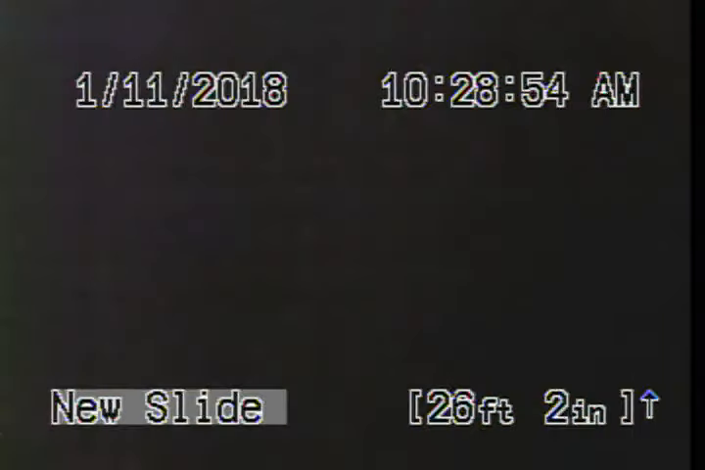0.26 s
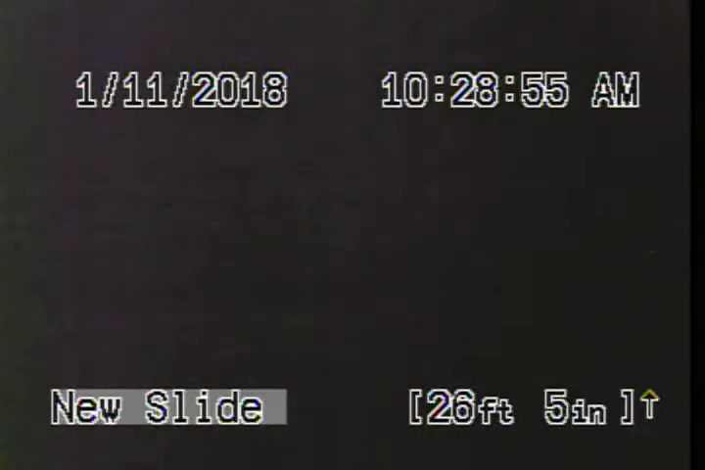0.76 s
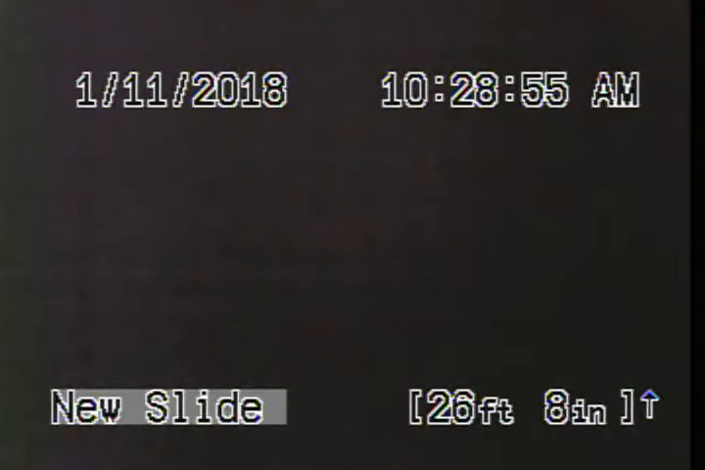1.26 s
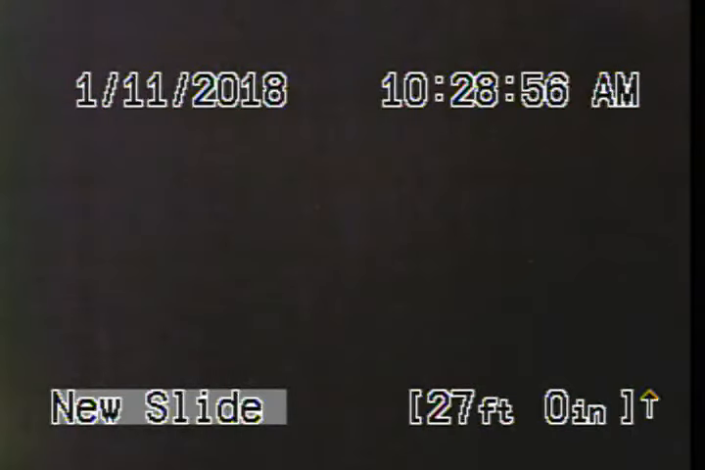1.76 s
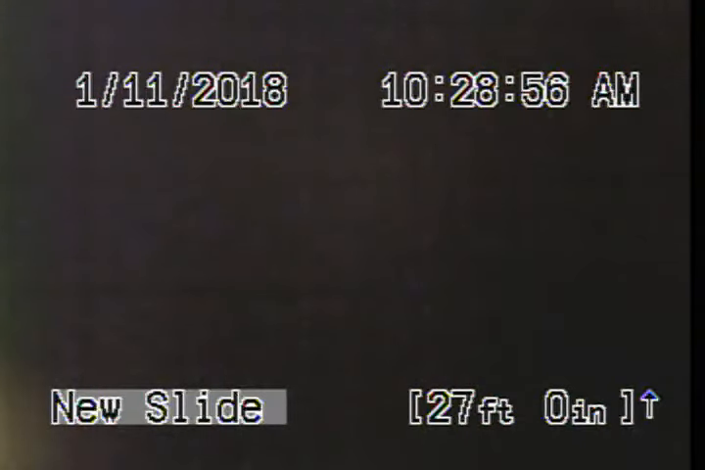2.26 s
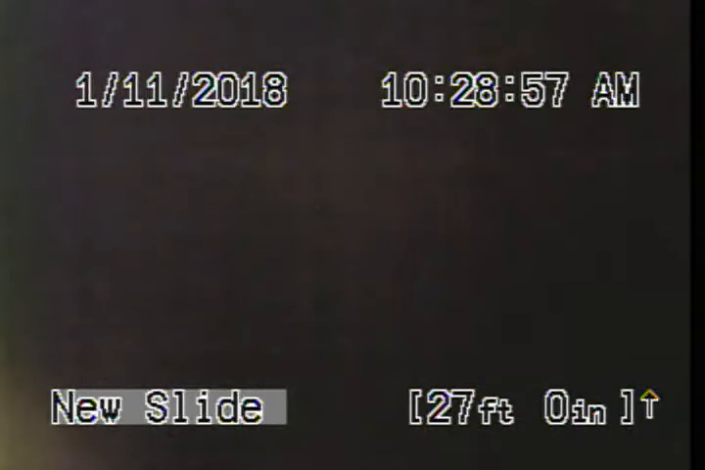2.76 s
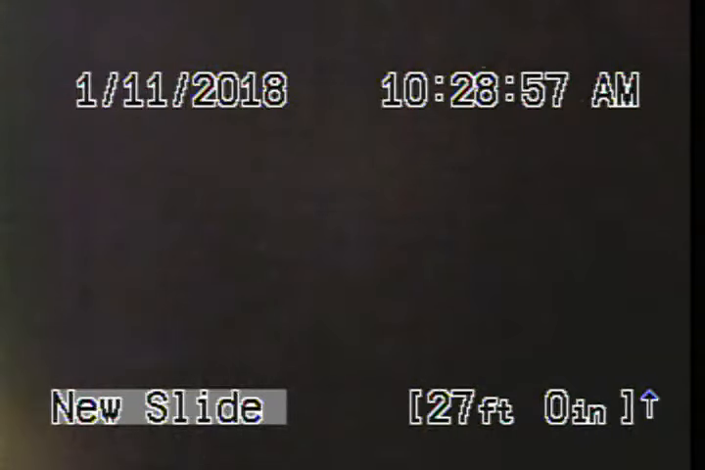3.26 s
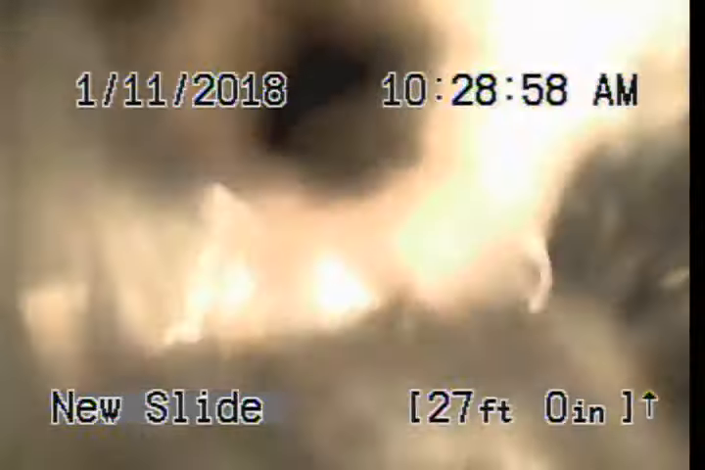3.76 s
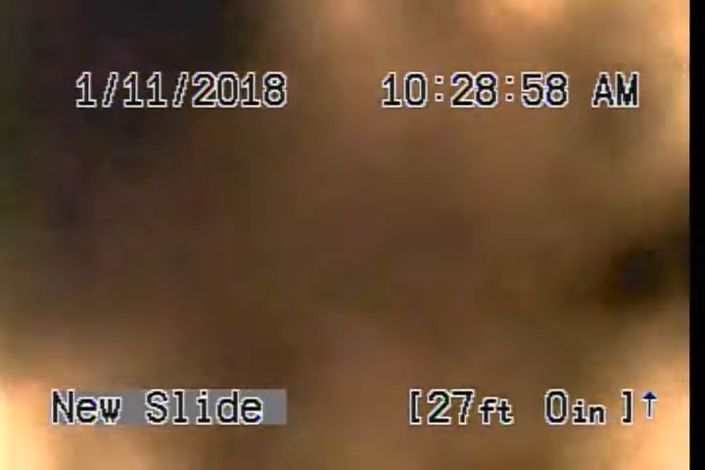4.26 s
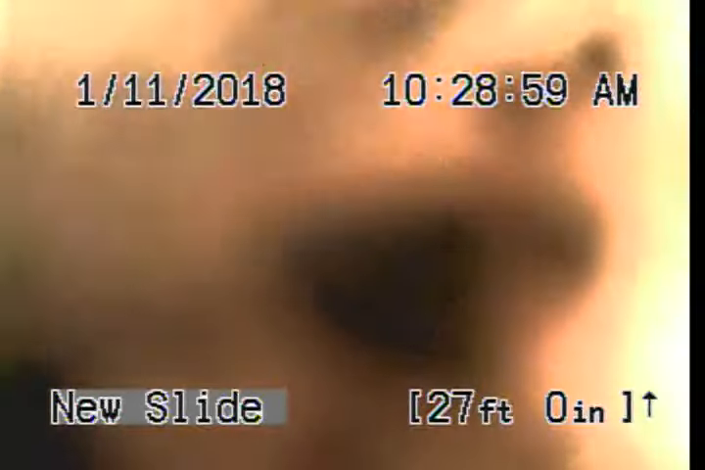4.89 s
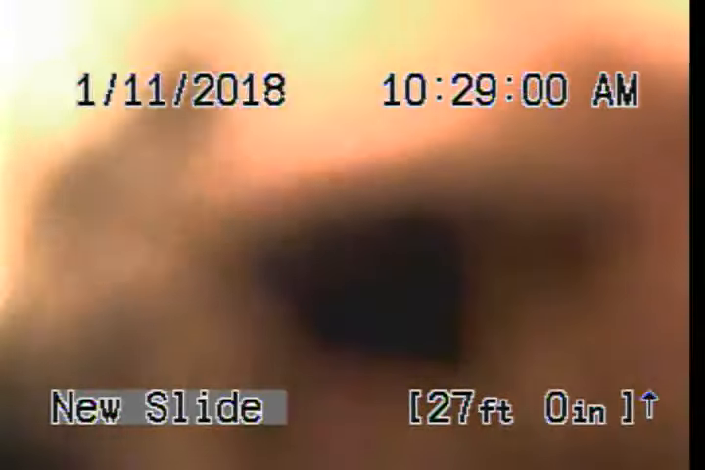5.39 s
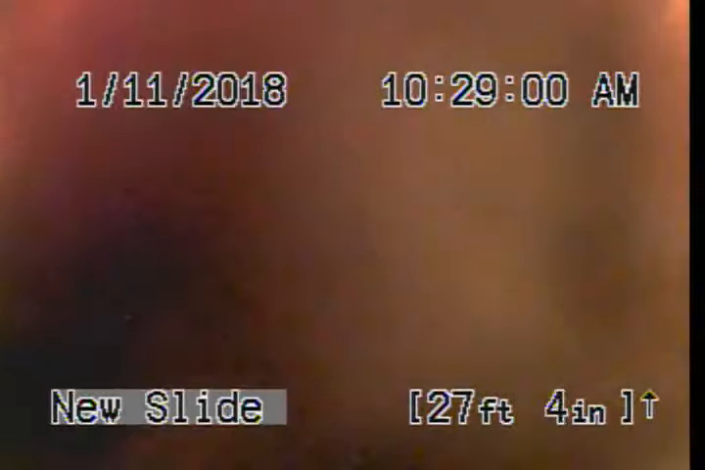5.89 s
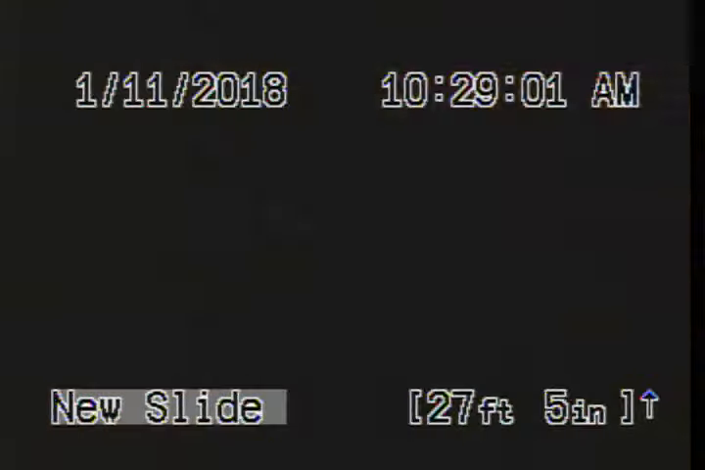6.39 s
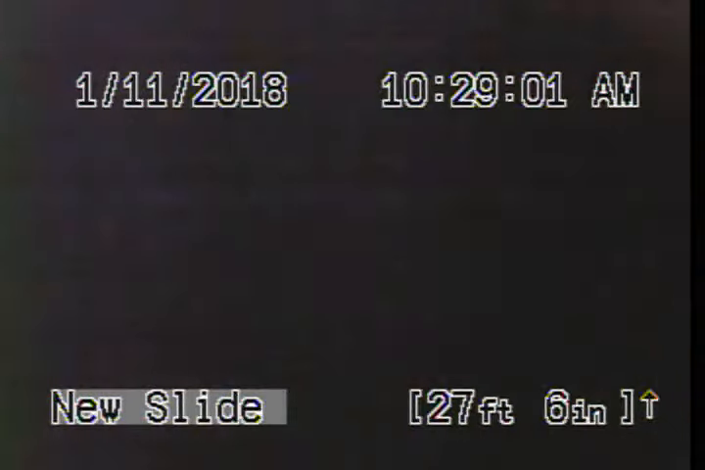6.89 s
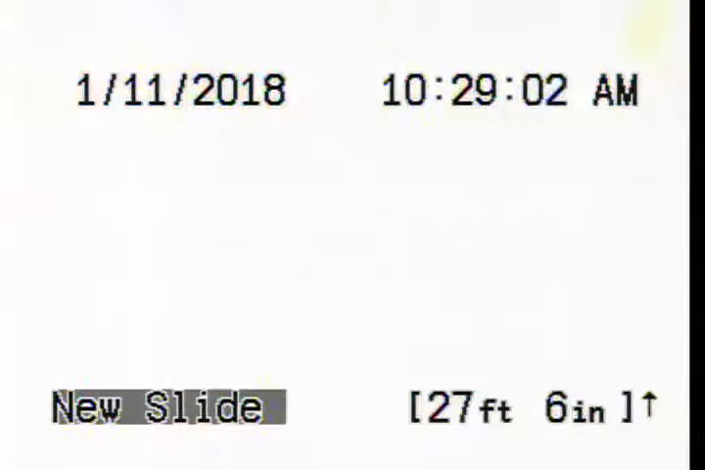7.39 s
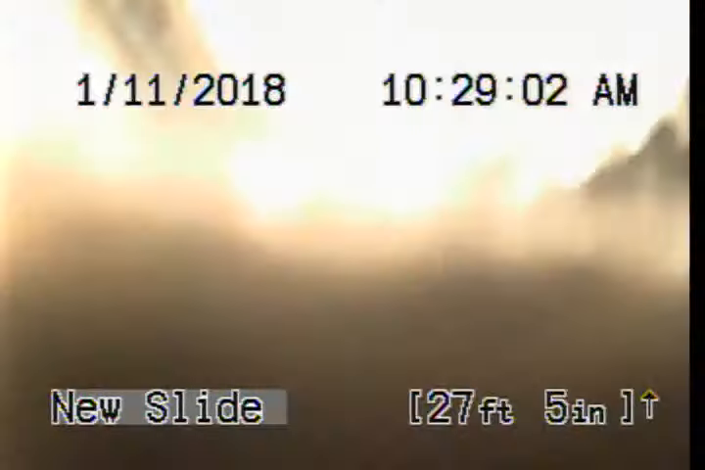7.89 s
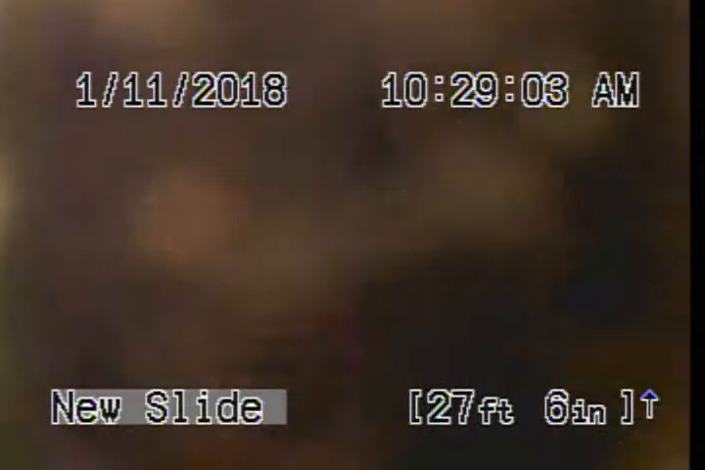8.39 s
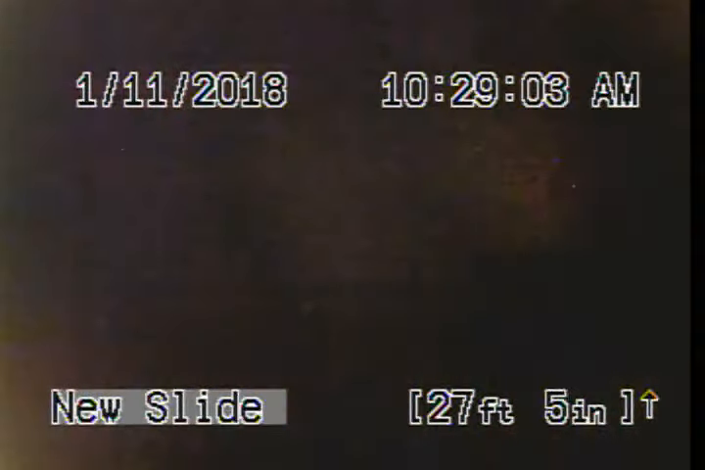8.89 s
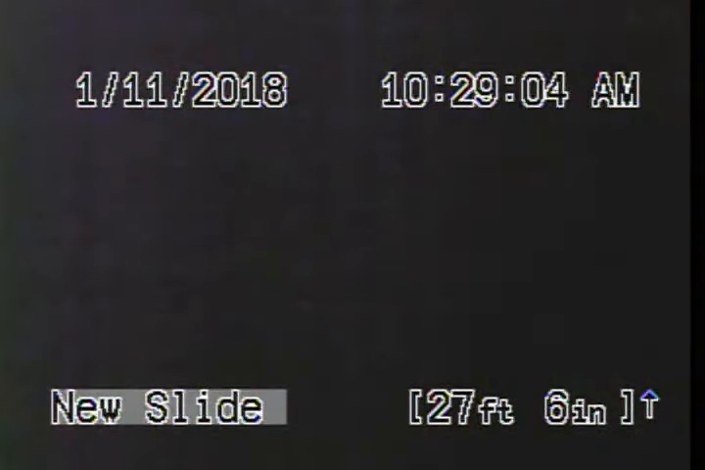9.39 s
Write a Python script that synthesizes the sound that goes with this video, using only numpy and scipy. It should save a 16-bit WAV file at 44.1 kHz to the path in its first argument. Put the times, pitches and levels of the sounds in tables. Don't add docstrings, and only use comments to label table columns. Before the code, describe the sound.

Close, lo-fi rattling of cable in a cast-iron pipe: low drag, gritty grinding and brief groaning tones under irregular distorted thumps, strongest in the first four seconds. Afterwards come separate short scrapes, bare metallic knocks, bright skims and tiny clicks, thinning out around seven to eight seconds before a last sharp burst of clanks near nine. Faint circuit hiss remains beneath.

```python
import sys
import numpy as np
from scipy import signal
from scipy.io import wavfile
from scipy.ndimage import uniform_filter1d

SR = 44100
rng = np.random.default_rng(int(sys.argv[2]) if len(sys.argv) > 2 else 0)


def output_pcm(signal):
    pcm = np.clip(np.atleast_2d(signal).T, -1, 1) * 32767
    wavfile.write(sys.argv[1], SR, np.round(pcm).astype(np.int16))


def gain_from_db(level_db):
    decades = np.asarray(level_db, float) / 20
    return 10 ** decades


N = 425565
STEP = 40


def rms_one(x):
    return x / np.sqrt(np.mean(x ** 2) + 1e-20)


def drift(rate_hz):
    r = np.exp(-2 * np.pi * STEP * rate_hz / SR)
    noise = rng.standard_normal(N // STEP + 2002)
    return rms_one(signal.lfilter([1], [1, -2 * r, r * r], noise)[2000:])


def fill_in(slow, count):
    return np.interp(np.arange(count) / STEP, np.arange(len(slow)), slow)


def butter(x, hz, kind, order=2):
    return signal.sosfilt(signal.butter(order, hz, kind, fs=SR, output="sos"), x)


def resonate(x, hz, width_hz):
    r = np.exp(-np.pi * width_hz / SR)
    return signal.lfilter([(1 - r * r) / 2, 0, (r * r - 1) / 2],
                          [1, -2 * r * np.cos(2 * np.pi * hz / SR), r * r], x)


def strokes(rows, rest_db, bite_db_per_s, ease_db_per_s):
    t = np.arange(0, N + STEP, STEP) / SR
    power = gain_from_db(2 * np.interp(t, np.arange(N) / SR, rest_db))
    for s, length, force_db in rows:
        before, after = np.maximum(s - t, 0), np.maximum(t - s - length, 0)
        fall_db = bite_db_per_s * before + ease_db_per_s * after
        power += gain_from_db(2 * (force_db - fall_db))
    return np.interp(np.arange(N) / SR, t, 10 * np.log10(power))


def scrape(modes, count, spread_db, lumpy_db, wander_db, slips):
    out = np.zeros(N)
    for hz, width_hz, level_db in modes:
        at = rng.integers(0, N, count)
        size_db = spread_db * np.minimum(rng.exponential(1, count), 5)
        size_db += (lumpy_db * slips + wander_db * np.tanh(drift(3.06)))[at // STEP]
        grains = np.bincount(at, gain_from_db(size_db) * rng.choice([-1, 1], count), N)
        ringing = resonate(grains + 1e-18, hz, width_hz)
        out += gain_from_db(level_db) * rms_one(resonate(ringing, hz, 5.14 * width_hz))
    return rms_one(out * uniform_filter1d(out ** 2, SR // 16) ** -.25)


def blows():
    # start in seconds, peak in dB, body pitch in Hz,
    # crack over peak in dB, iron ring over peak in dB.
    clangs = [(0.027, -3, 344, -20, -13), (3.75, -18.5, 274, -8, -10.5), (4.434, 8, 202, -18.5, -14.5),
              (4.508, -21, 353, -27, -28), (4.637, -9, 318, -15, -16), (4.714, -4, 420, -20, -19),
              (4.773, -7, 420, -25, -16), (5.381, 0.5, 984, -14, -9), (5.67, -9.5, 292, -11, -25),
              (5.758, -6.5, 304, -29, -19.5), (5.814, -16, 320, -18, -33), (5.894, -5.5, 261, -32, -16.5),
              (6.353, -5, 311, -8.5, -16.5), (6.713, -8, 303, -27, -20), (6.925, 1, 620, -32, -17),
              (7.043, -7, 312, -27, -21.5), (7.281, -23, 285, -47, -27), (7.452, -10, 206, -47, -35.5),
              (8.72, -17.5, 363, -21, -21), (8.915, -3, 312, -8, -12), (9.148, -3, 315, -29, -17.5),
              (9.166, 5, 301, -18, -22.5)]
    # start in seconds, peak in dB, body pitch in Hz,
    # time to fall 60 dB in seconds.
    thuds = [(.078, 4.5, 278, 0.15), (0.2, -12, 292, 0.042), (.296, -0.5, 333, 0.031),
             (.351, -11, 220.8, 0.43), (.44, 0.5, 246, 0.042), (0.512, -1, 277, 0.073),
             (.728, -1.5, 378, .038), (0.895, -4.5, 187, 0.092), (.96, -5, 189, 0.079),
             (1.015, -1, 304, 0.091), (1.689, -17, 720, 0.19), (2.543, -3, 447, 0.035),
             (2.719, -10, 212.7, 0.43), (3.166, -5.5, 302, 0.049), (3.21, 2.5, 326, 0.12),
             (3.895, 4.5, 192.9, 0.21), (4.243, 3, 377, 0.043), (4.912, -28, 377, 0.099),
             (5.383, -1.5, 303, 0.032), (7.224, -10.5, 174, 0.055), (7.58, -5, 460, 0.046),
             (7.749, -18, 184, 0.09), (8.258, -17, 306, 0.052), (8.549, -17.5, 293.5, 0.25),
             (8.898, -9.5, 237, 0.048), (9.129, -2.5, 447, 0.042), (9.19, -2.5, 193.3, 0.13),
             (9.415, -14, 266, 0.21)]
    # start in seconds, peak in dB, body pitch in Hz,
    # crack over peak in dB, time to fall 60 dB in seconds.
    hard_knocks = [(.616, -2, 302.2, -18, 0.29), (0.803, 2.5, 331.4, -2.5, 0.084),
                   (1.252, -29, 280, -13, 0.14), (1.334, 8.5, 394, -30, 0.04),
                   (1.518, 16.5, 186.4, -16, 0.081), (1.603, -2.5, 615, -12.5, 0.19),
                   (1.796, 35, 191.3, -26, 0.03), (1.85, 8.5, 322, -35, 0.16), (2.17, -3, 352.5, -49, 0.17),
                   (2.189, 11.5, 186, -9.5, 0.024), (2.236, 4.5, 245, -22, 0.052),
                   (2.323, -14.5, 740, -2, 0.032), (2.342, -2, 196, -32, 0.1),
                   (2.361, -10.5, 342, -11.5, 0.15), (2.445, -14, 235, -13, 0.18),
                   (2.604, -1.5, 215, -21, 0.084), (2.928, 4.5, 297, -35, 0.23),
                   (3.066, 4.5, 344, -27, 0.037), (3.395, 10.5, 209, -49, 0.15),
                   (3.615, -1.5, 303.5, -38, 0.26), (3.83, -0.5, 321, -36, 0.18)]
    # start in seconds, peak in dB, body pitch in Hz,
    # crack over peak in dB.
    raps = [(4.214, 5.5, 168.6, -27), (4.697, -6, 400, -30), (5.05, -13, 186, -41), (5.19, -1.5, 366, -34),
            (5.413, -3.5, 240, -53), (5.97, -26, 335, -16), (6.068, -2.5, 192, -8), (6.335, -13, 724, -11),
            (6.422, -14, 310, -36), (7.696, -16.5, 232, -25), (8.193, -2, 339, -15),
            (8.298, -23.5, 185, -11.5), (8.448, -26, 250, -28), (8.478, -8, 310, -14),
            (8.785, -6, 1040, -11), (7.515, -33, 297, -3), (9.64, -22, 348, -23)]
    padded_s, bare_s = .0034, .0011
    return ([(s, db, hz, -49, -50.5, t60, padded_s) for s, db, hz, t60 in thuds]
            + [(s, db, hz, crack, -52.5, t60, padded_s) for s, db, hz, crack, t60 in hard_knocks]
            + [(s, db, hz, crack, -40, 0.052, bare_s) for s, db, hz, crack in raps]
            + [(s, db, hz, crack, ring, 0.055, bare_s) for s, db, hz, crack, ring in clangs])


def jolts():
    out, t = np.zeros((2, N + SR)), np.arange(SR // 4) / SR
    for s, peak_db, _, crack_db, _, t60, _ in blows():
        dying = gain_from_db(peak_db - 60 * (t / max(t60, .01)) ** 1.19) * (1 - np.exp(-t / 0.0008))
        at = round(s * SR)
        out[:, at:at + len(t)] += dying * gain_from_db([[0.41 * crack_db - 3.0], [crack_db + 0.5]])
    return out[:, :N]


def cable():
    # pitch in Hz, width in Hz, level in dB.
    drag_modes = [(116, 93, -6), (194.3, 46.3, 3.5), (245, 61.3, -1), (320.5, 62.3, 5.5), (430.3, 43, -2)]
    grind_modes = [(493.7, 125, 2.5), (625, 97, 2.5), (740, 46.5, 1), (848, 99, -5), (1010, 39, -5),
                   (1169, 54, -8), (1240, 330, -15), (1640, 480, -12)]
    rasp_modes = [(1550, 300, -9.5), (1830, 200, -3.5), (2180, 250, 0), (2400, 170, -3), (2700, 270, -7),
                  (2900, 150, -4), (3200, 250, -5), (3550, 500, -9), (4000, 300, -4)]
    # start in seconds, length in seconds, force in dB, grit (grind over drag) in dB.
    shoves = [(0, 0.19, -11, -14), (0.35, 0.39, -19, -12.5), (0.616, 0.11, -12.5, -8),
              (0.805, 0.03, -10.5, -13), (0.875, 0.033, -24.5, -2), (0.968, 0.056, -15, -7),
              (1.249, .06, -30, -1), (1.327, 0.053, -15, -6.5), (1.531, 0.071, -7.5, -13.5),
              (1.602, 0.17, -13.5, -1.2), (1.801, 0.1, -3, -15.5), (1.87, .22, -7, 4),
              (2.179, 0.048, -9, -5.5), (2.338, 0.098, -13.5, -7), (2.448, 0.058, -30.5, 1.5),
              (2.604, 0.033, -12, -8), (2.678, 0.15, -16.5, -5), (2.929, 0.034, -7, -1.5),
              (2.998, 0.019, -14, -14), (3.074, 0.012, -11.5, -8.5), (3.174, 0.071, -19, -4),
              (3.253, .08, -14.5, 7), (3.346, 0.06, -2, -9.5), (3.461, 0.11, -18.5, -6),
              (3.527, 0.06, -20.5, 3.5), (3.617, 0.081, -10, 2), (3.723, 0.088, -18, -2),
              (3.827, 0.064, -6, -0.5), (3.898, 0.057, -18.5, -18)]
    prods = [(4.136, 0.12, -19, -2.5), (4.226, 0.01, -8.5, -10.5), (4.272, 0.24, -29, 7.5),
             (4.444, 0.026, -10.5, -8), (4.515, 0.11, -23, -6.5), (4.65, 0.13, -25, -4),
             (4.926, 0.056, -24.5, -16), (5.069, 0.14, -23.5, -7), (5.15, 0.27, -20, -3.5),
             (5.388, 0.022, -19.5, -31), (5.481, 0.16, -26, -3), (5.702, 0.075, -18.5, -5),
             (5.877, 0.15, -20, -5.5), (5.99, 0.16, -19, -13.5), (6.172, 0.11, -25.5, -3.5),
             (6.342, 0.027, -17, -10.5), (6.413, 0.15, -29, -5), (6.544, 0.32, -20, -2),
             (6.94, 0.014, -19, -3), (6.975, 0.091, -24.5, -4.5), (7.259, 0.14, -27, -6.5),
             (7.437, 0.084, -25, -13), (7.702, 0.034, -27.5, -8), (8.202, 0.008, -19.5, -5.5),
             (8.468, 0.16, -21, -12.5), (8.795, 0.076, -21.5, 5), (8.878, 0.088, -15, -3),
             (8.994, 0.064, -22.5, -1.5), (9.14, 0.14, -20, -6), (9.401, 0.3, -18, -10)]
    # start in seconds, length in seconds, level in dB.
    skims = [(.43, 0.15, -50), (2.36, 0.042, -42), (2.445, 0.021, -47), (2.322, 0.013, -48),
             (3.1, 0.12, -48), (4.15, 0.08, -49), (4.46, 0.02, -29.5), (4.72, 0.14, -47), (5.04, .1, -56),
             (5.25, .12, -37.5), (5.85, 0.13, -41), (6.22, 0.055, -47), (6.41, 0.12, -41.5),
             (6.66, 0.16, -34), (7.23, 0.16, -54.5), (7.91, 0.18, -60), (8.72, 0.076, -39.5),
             (8.93, .14, -40), (9.22, 0.14, -51.5), (9.45, 0.24, -47.5)]
    # time in seconds, resting weight in dB,
    # roughness of the rust (rasp over grind) in dB.
    contact = [(0, -20.5, -12.5), (.3, -31.5, -21.5), (1.0, -31.5, -25), (1.5, -30.5, -23),
               (2.0, -22.5, -19), (2.3, -30.5, -31), (3.0, -19, -20.5), (3.9, -30.5, -25.5),
               (4.2, -28.5, -14), (4.9, -33.5, -18), (5.5, -43, -14.5), (6.2, -44.5, -15),
               (6.8, -31.5, -17.5), (7.15, -35.5, -20.5), (7.6, -35.5, -8.5), (8.2, -35, -26),
               (8.8, -31.5, -13.5), (9.65, -38.5, -24)]

    s, weight_db, rough_db = np.transpose(contact)
    rest_db, rust_db = [np.interp(np.arange(N) / SR, s, column) for column in (weight_db, rough_db)]
    pushes = [*shoves, *prods]
    gritty = [(s, length, db + grit) for s, length, db, grit in pushes]
    drag_db = strokes([row[:-1] for row in pushes], rest_db, bite_db_per_s=494.5, ease_db_per_s=219)
    grind_db = strokes(gritty, rest_db - 8, bite_db_per_s=802, ease_db_per_s=349.5)
    rasp_db = strokes(skims, grind_db + rust_db + 0.5, bite_db_per_s=802, ease_db_per_s=349.5)
    extra_db = 0.88 * np.maximum(np.maximum(drag_db, grind_db) + 12.5, 0)

    slips = drift(15)
    dull_jolt, bright_jolt = jolts()
    drag = scrape(drag_modes, count=4000, spread_db=2.0, lumpy_db=3.0, wander_db=7.0, slips=slips)
    grind = scrape(grind_modes, count=8000, spread_db=4.0, lumpy_db=1.5, wander_db=7, slips=slips)
    rasp = scrape(rasp_modes, count=15000, spread_db=1.5, lumpy_db=1.0, wander_db=6, slips=slips)
    rumble = rms_one(butter(rng.standard_normal(N), [20, 120], "band"))
    return (gain_from_db(drag_db + extra_db) * (drag + gain_from_db(-34.5) * rumble)
            + (gain_from_db(grind_db + extra_db) + dull_jolt) * grind
            + (gain_from_db(rasp_db + extra_db + 7.0) + bright_jolt) * (rasp + gain_from_db(-13.5) * rumble))


def hiss():
    return gain_from_db(-65.5) * rng.standard_normal(N)


def slaps(under):
    # time of the peak in seconds,
    # peak in dB, length of the swing in seconds.
    swings = [(0, -15, .003), (9.65, -14, .003), (.02, -8, .003), (1.0212, -2, 0.0027),
              (2.6106, -2.5, 0.0034), (6.0741, -3.5, 0.0039), (8.8788, -7, 0.0036), (.807, 8.5, 0.0018),
              (.829, 3.5, .0016), (3.0, 3.5, 0.002), (3.084, 2, 0.0021), (.0815, 1, .0018),
              (0.101, 3, .0018), (0.648, 5, .0016), (.677, 4, .0016), (2.2205, 1, .0016), (3.073, 4, .0016),
              (3.23, 0, .002), (5.3852, 6, 0.0012), (5.388, 5, .0014), (6.36, .5, 0.0018), (4.468, 6, .002),
              (4.245, 5, .002), (.813, 6, .0016), (2.237, 6, .0016), (2.241, 4, .0016), (2.105, 6, .0016),
              (3.246, 5, .0016), (2.981, 5, .0016), (1.645, 5, .0016), (1.69, 5, .0016), (.628, 6, .0016),
              (6.9294, 4.5, .0016), (8.9062, 2.5, 0.0016), (8.9177, 5, .0016), (9.167, 10.5, .0014),
              (9.17, 5, 0.0019), (9.193, 4, .002)]
    out = under.copy()
    for s, peak_db, length in swings:
        first = max(round((s - .75 * length) * SR), 0)
        last = min(round((s + .75 * length) * SR), N)
        turn = 2 * np.pi * (np.arange(first, last) / SR - s) / length
        swing = gain_from_db(peak_db) * np.cos(turn)
        out[first:last] += np.cos(turn / 3) * (swing - under[first:last])
    return out


def knocks():
    # pitch in Hz, level in dB,
    # time to fall 60 dB in seconds.
    iron_cluster = [(2826, -4, .2), (2852, -15, .2), (2888, -1, .1), (2960, -3, .05)]
    iron_modes = [(2720, 4, 0.019), (2800, -14, 0.052), (2400, -2, 0.029), (1054, 0.5, 0.067),
                  (110, 2.5, 0.35)]
    modes, contacts = [*iron_cluster, *iron_modes], blows()
    out, t = np.zeros(N + SR), np.arange(SR // 4) / SR
    chance = rng.standard_normal((len(contacts), len(modes)))
    rubbing = .9 * fill_in(drift(45), N + SR)
    grip = gain_from_db(-7.5) + np.exp(-(t / .025) ** 2)
    for (s, peak_db, hz, _, ring_db, t60, rise_s), draw in zip(contacts, chance):
        at = round(s * SR)
        hit = np.sin(2 * np.pi * hz * t) * gain_from_db(-60 * (t / max(t60, .01)) ** 1.18)
        hit *= 1 - np.exp(-t / rise_s)
        for (mode_hz, mode_db, mode_t60), luck in zip(modes, draw):
            swell = np.exp(-np.log(1000) * t / mode_t60) * (1 - np.exp(-(t * mode_hz / 30) ** 2))
            phase = 2 * np.pi * mode_hz * t + 3 * luck + rubbing[at:at + len(t)]
            hit += gain_from_db(ring_db + mode_db + 9.5 + 0.8 * luck) * swell * grip * np.sin(phase)
        out[at:at + len(t)] += gain_from_db(peak_db - 0.5) * hit
    return out[:N]


def ticks():
    # start in seconds, peak in dB, low snap over peak in dB.
    flakes = [(0.8166, -13, 0), (0.9625, -26, 10), (1.0197, -40.5, 0), (1.5983, -18, 1), (1.8706, -18, 1),
              (1.9006, -9, 4), (2.163, -27, 4), (2.444, -22, 8), (2.5494, -32, -0.5), (2.914, -20, 0.5),
              (3.064, -16, 8), (3.2435, -18.5, 3), (3.6386, -14, 3.5), (3.7653, -16, 0.5),
              (4.0412, -48, 2.5), (4.177, -17, 6), (4.3848, -13, 2), (4.454, -4, -9), (4.4952, -26, 0),
              (4.6375, -22, 8), (4.697, -24, 12), (4.7145, -16, 6), (6.0665, -6, -3), (6.069, -7, -3),
              (4.213, -14, 8), (4.435, -14, 8), (7.516, -30, 3), (3.52, -22, 2), (6.354, -18, 4),
              (.177, -22, 3), (8.481, -22, 0), (4.775, -22, -5), (4.7862, -24, 3), (5.041, -26, 0),
              (5.225, -28, -2), (5.2445, -17, 2), (5.457, -30, -5.5), (5.6795, -23, 8), (5.7663, -25, -10),
              (5.8147, -28, -2.5), (6.333, -22, 2), (6.6428, -28, -11), (6.6832, -30, 2), (6.9247, -13, 4),
              (6.9407, -12, 4), (7.044, -20, 12), (7.5794, -46, 0), (8.1967, -18.5, 3), (8.4694, -27.5, 5),
              (8.737, -25.5, 10.5), (8.7859, -21, 4), (8.9126, -9, 3), (9.0473, -26, -4), (9.1215, -32, 2),
              (9.1586, -17, 0), (9.175, -6.5, -7), (9.4519, -25, 2)]
    # pitch in Hz, level in dB, time to fall 60 dB in seconds.
    flake_modes = [(1060, -0.5, 0.014), (1590, -7, 0.0074), (1850, -6, 0.0065), (2400, -4, .015),
                   (2900, 0.5, .025), (3300, -6, .012), (3900, -2.5, 0.011)]
    out = np.zeros(N)
    s, peak_db, low_db = np.transpose(flakes)
    luck = rng.standard_normal((len(s), len(flake_modes)))
    for (hz, level_db, t60), draw in zip(flake_modes, luck.T):
        clicks = np.zeros(N)
        click_db = peak_db + level_db - 6 + low_db * (hz < 2000) + 2.6 * draw
        clicks[(s * SR).astype(int)] = gain_from_db(click_db) * np.sign(draw)
        r, w = gain_from_db(-60 / (max(t60, .003) * SR)), 2 * np.pi * hz / SR
        out += signal.lfilter([0, np.sin(w)], [1, -2 * r * np.cos(w), r * r], clicks + 1e-18)
    return out


def singing():
    # start in seconds, end in seconds, starting pitch in Hz, final pitch in Hz, level in dB.
    songs = [(1.617, 1.77, 750, 745, -6), (2.68, 2.82, 1250, 1250, -30), (2.68, 2.82, 1600, 1600, -36),
             (3.1, 3.2, 2900, 2950, -46), (.43, .6, 3000, 3000, -51), (4.55, 4.63, 2900, 2900, -48),
             (4.45, 4.62, 1100, 1050, -30), (4.638, 4.66, 1050, 1000, -20), (6.82, 6.92, 2900, 2880, -41),
             (3.75, 3.79, 2900, 2850, -38), (1.936, 2.154, 740, 747, -9), (3.263, 3.42, 740, 723, -7),
             (3.614, 3.713, 702.4, 740, -9), (4.108, 4.234, 1620, 1560, -31.5),
             (4.13, 4.2, 1300, 1240, -32), (7.43, 7.53, 1750, 1750, -46), (8.2, 8.265, 2850, 2800, -53),
             (7.24, 7.423, 3050, 2940, -50.5), (5.465, 5.623, 1020, 1055, -30.5),
             (6.389, 6.562, 2980, 2545, -41), (6.508, 6.865, 1010, 980, -26),
             (8.771, 8.99, 1010, 1000, -17.5), (9.196, 9.305, 3200, 3550, -46),
             (2.357, 2.424, 3735, 3710, -37), (4.117, 4.21, 2400, 2410, -43.5),
             (4.25, 4.36, 1800, 1840, -39), (4.48, 4.565, 2420, 2400, -43), (5.334, 5.388, 2400, 2400, -39),
             (5.554, 5.647, 2470, 2360, -42), (6.62, 6.79, 1850, 1850, -37),
             (6.499, 6.903, 2400, 2360, -34.5), (8.76, 9.089, 2364, 2515, -30.5),
             (8.984, 9.117, 2890, 2920, -44), (9.27, 9.35, 2910, 2900, -57)]
    out, t = np.zeros(N), np.arange(N) / SR
    waver, flutter = fill_in(drift(32), N), fill_in(drift(90), N)
    for start, end, start_hz, end_hz, level_db in songs:
        part = slice(round(start * SR), round(end * SR))
        along = (t[part] - start) / (end - start)
        hz = (start_hz + (end_hz - start_hz) * along) * (1 + .015 * waver[part])
        swell = np.sqrt(np.abs(np.sin(np.pi * along)))
        grip = 1 + flutter[part] * (start_hz - 600) / 600
        out[part] += gain_from_db(level_db) * swell * grip * np.sin(2 * np.pi * np.cumsum(hz) / SR)
    return out


def scene():
    return slaps(cable() + hiss() + knocks() + ticks() + singing())[None]


def low_pass(x):
    return signal.sosfilt(signal.butter(12, 15850, fs=SR, output="sos"), x)


def record(dry):
    rail_low, rail_high, converter_top, output_top = .44, .95, .71, .712
    edge = 441
    x = np.pad(dry, [(0, 0), (edge, edge)], "reflect")
    x = np.where(x < 0, rail_low * np.tanh(x / rail_low), np.minimum(x, rail_high))
    x = butter(x, 11, "high", order=1)
    x = signal.resample_poly(x, 80, 441, axis=1)
    x = np.clip(x, -converter_top, converter_top)
    x = .525 * x + .475 * np.roll(x, 2, axis=1)
    x = signal.resample_poly(x, 441, 80, axis=1, window=("kaiser", 7.5))
    x = signal.sosfiltfilt(signal.butter(4, 3900, fs=SR, output="sos"), x)
    x = np.clip(x, -output_top, output_top)[:, edge:edge + N]
    return low_pass(x)


dry = scene()
out = record(dry)
output_pcm(out)
```